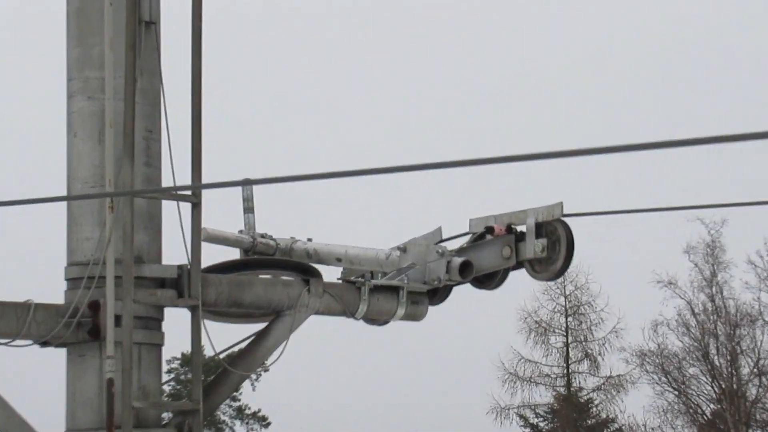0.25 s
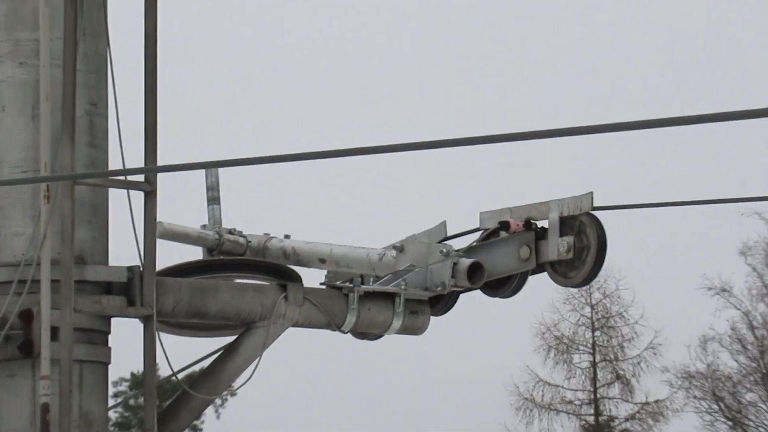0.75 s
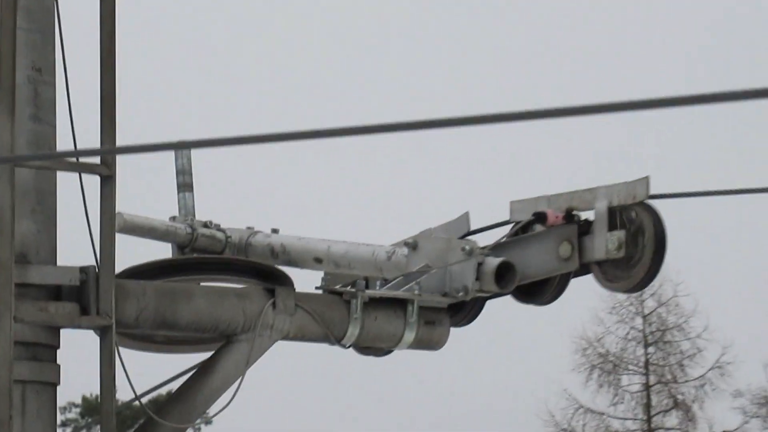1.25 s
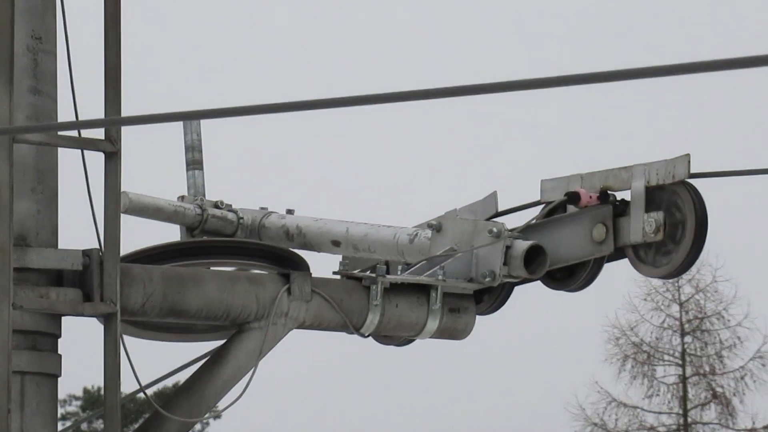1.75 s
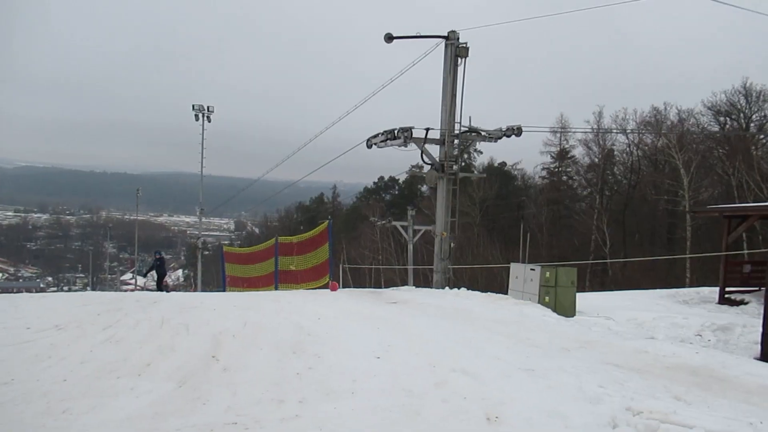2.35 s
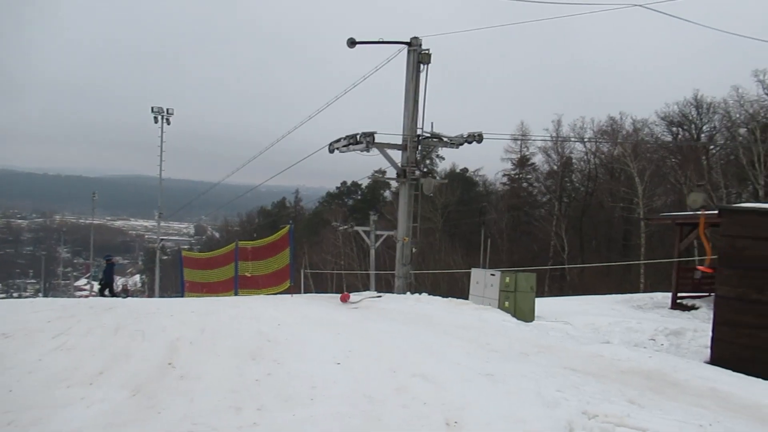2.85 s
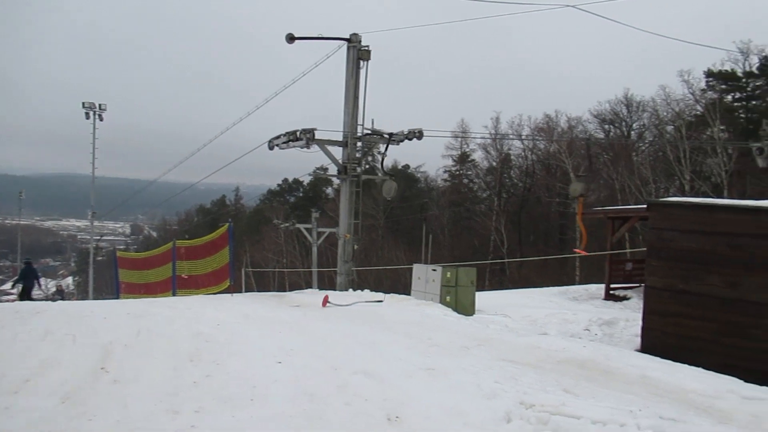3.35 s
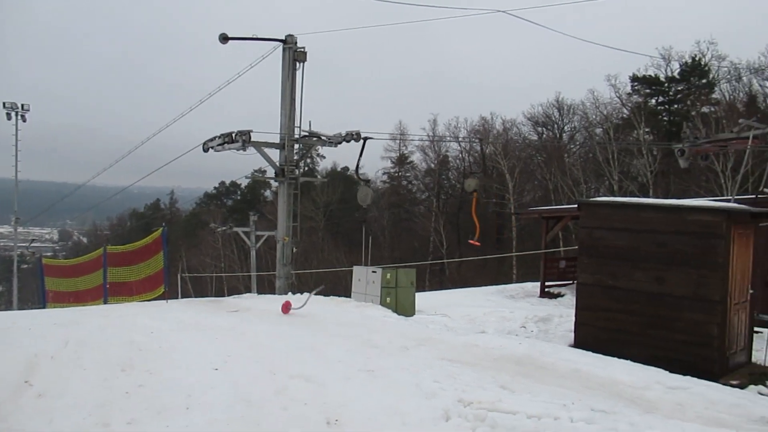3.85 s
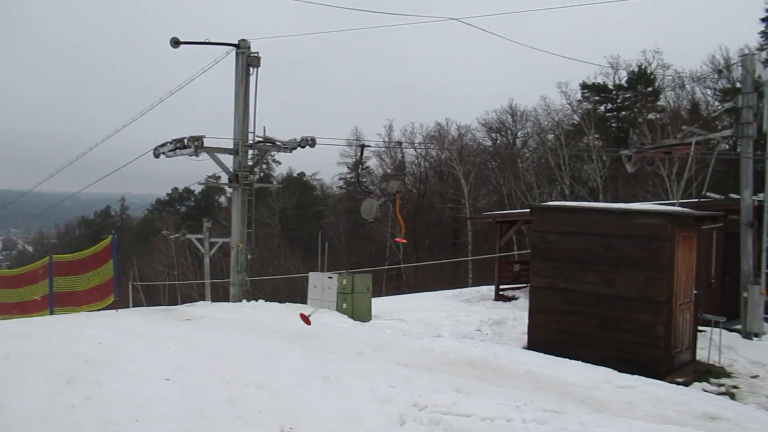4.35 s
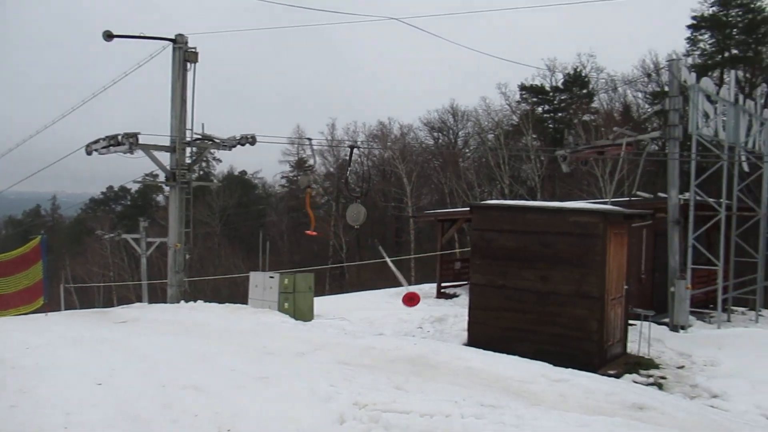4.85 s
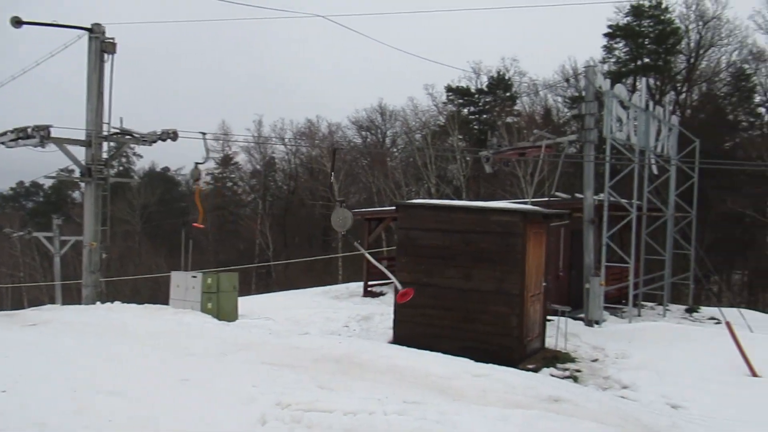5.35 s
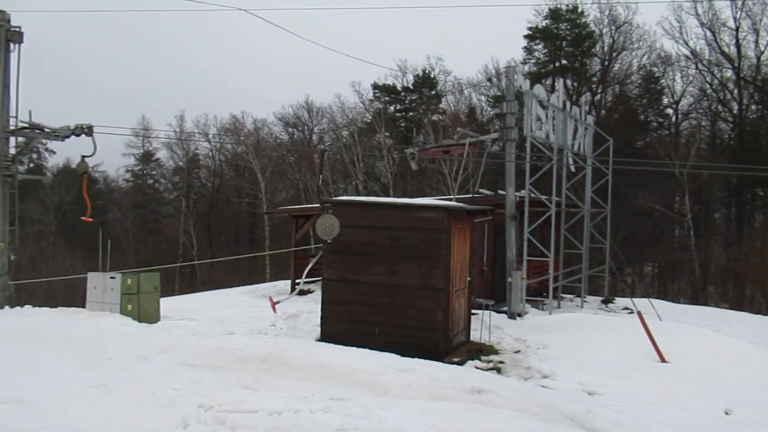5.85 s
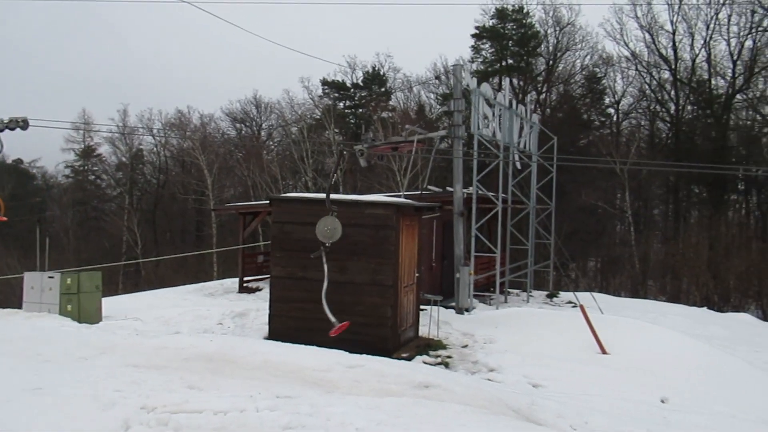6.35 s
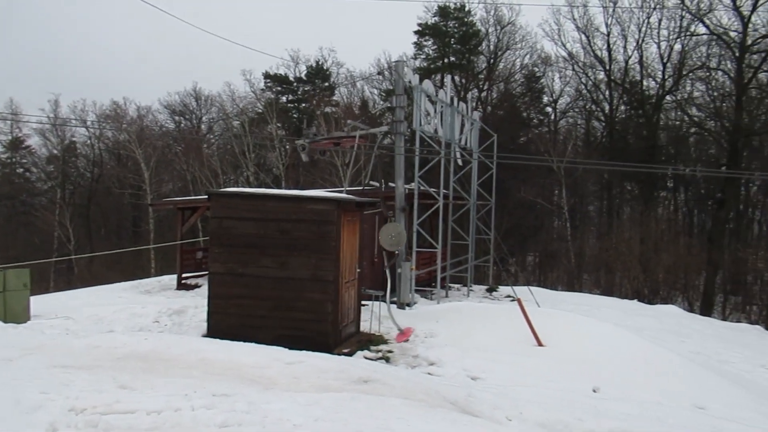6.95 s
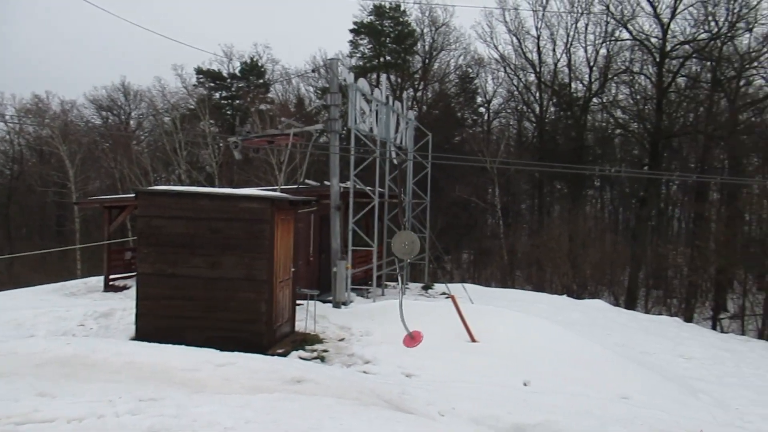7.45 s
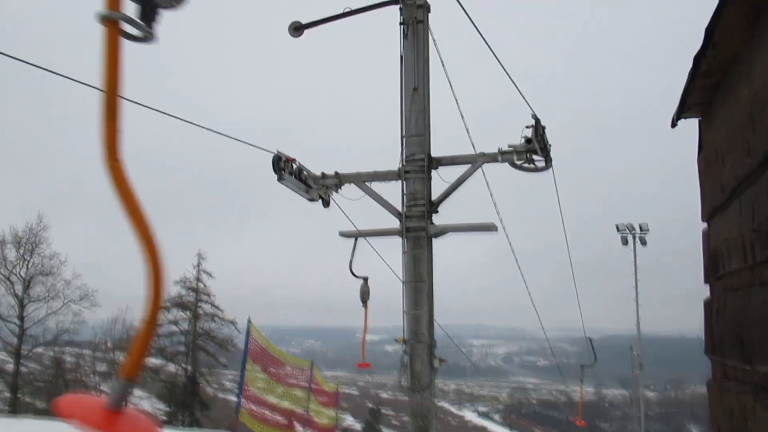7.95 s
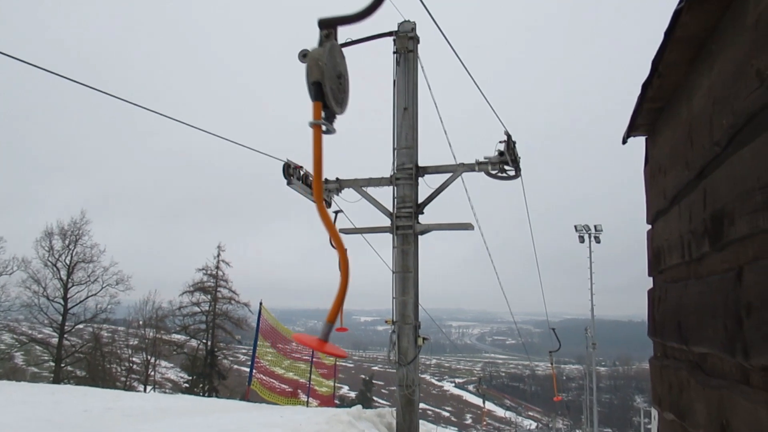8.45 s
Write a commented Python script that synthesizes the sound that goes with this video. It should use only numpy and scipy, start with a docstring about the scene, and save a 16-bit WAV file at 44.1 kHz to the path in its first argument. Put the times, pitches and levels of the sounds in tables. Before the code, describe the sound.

Outdoors in winter, a haul rope rolls over sheaves with a soft, cyclic rub, hiss and faint ring. After a brief silence, an empty metal platter scrapes and crunches over snow, its loose hanger rattling and knocking while wind thumps the microphone. It lifts off into rustles and separate clacks. Another short gap leads to a fierce, bright wind buffet over a faint, distant lift.

```python
"""A platter ski lift on a windy winter day, heard from three places with short silences between.
At the tower, the haul rope rolls over the sheaves as coloured noise that changes with each turn. On the track, an
empty platter scrapes over snow, then rubs and rustles after it lifts off, built of random grains and ringing
chips, while knocks ring the hanger's modes. Last, a platter passes overhead in a strong gust, with the lift far
off. At every place shaped noise and short bursts make the wind that buffets the microphone."""
import sys
import numpy as np
from scipy import signal
from scipy.fft import rfft, irfft, next_fast_len
from scipy.io import wavfile
from scipy.ndimage import uniform_filter1d, minimum_filter1d, map_coordinates

SR = 44100
rng = np.random.default_rng(int(sys.argv[2]) if len(sys.argv) > 2 else 0)


def waveform_to_disk(signal):
    """Save audio, clipped to [-1, 1], as 16-bit WAV at the path in sys.argv[1]."""
    frames = np.transpose(np.atleast_2d(signal))
    scaled = np.clip(frames, -1, 1) * 32767
    samples = np.round(scaled).astype(np.int16)
    wavfile.write(sys.argv[1], SR, samples)


N = 384547

# when the microphone hears each place: start t/s, end t/s
TOWER, TRACK, OVERHEAD = (0, 2.155), (2.365, 7.785), (8.003, 8.73)

# Table levels are in dB; some layers add a gain of their own.
# wind under the gusts: [t/s, level/dB], and its spectrum: [f/Hz, density/dB]
WIND_LEVEL = [(0, -52.5), (2.15, -45.5), (2.45, -28.5), (2.65, -43.5), (3.25, -31.5), (3.5, -36),
              (4.25, -25), (4.8, -33), (5.2, -38.5), (5.75, -29), (6.6, -38), (7.4, -37.5), (8, -40.5)]
WIND_SPECTRUM = [(25, -8.5), (60, 1.5), (110, -1), (200, -7.5), (310, -11), (520, -22.5), (850, -52.5)]
# gusts on the microphone: [start t/s, length/s, level/dB]
GUST_EVENTS = [(.4, 0.344, -41.5), (1.07, 0.28, -42.5), (2.39, 0.14, -28), (2.82, 0.07, -19.5),
               (3.045, 0.083, -20.5), (3.59, 0.13, -21.5), (3.865, 0.042, -16), (3.98, 0.51, -21.5),
               (4.58, 0.15, -20), (8, 0.07, -26.5), (8.093, 0.04, -27.5), (8.152, 0.066, -19.5),
               (8.215, 0.037, -19.5), (8.278, 0.12, -24.5)]
GUST_ATTACK_S, GUST_RELEASE_S = 0.0035, 0.0086
# single eddies that stand out at the microphone: [t/s, level/dB, centre f/Hz]
EDDY_EVENTS = [(0.43, -24, 145), (0.468, -26, 130), (0.575, -23, 124), (0.723, -26, 95.5), (1.24, -27, 119),
               (1.317, -22.5, 149), (1.666, -15, 156), (2.408, -19, 126), (2.476, -17.5, 130),
               (2.828, -12.5, 191), (2.875, -19.5, 222), (3.11, -17, 150), (3.654, -17, 230),
               (3.892, -17, 188), (3.981, -9.5, 110.7), (4.138, -14, 208), (4.174, -10.5, 200),
               (4.227, -19.5, 280), (4.345, -16.5, 220), (4.609, -4, 178), (4.647, -18.5, 246),
               (4.901, -13.5, 248), (4.98, -15.5, 184), (5.025, -23.5, 800), (5.035, -17.5, 162),
               (5.561, -15.5, 130), (5.623, -10.5, 202), (5.96, -23.5, 254), (6.294, -18.5, 116),
               (8.017, -11.5, 423), (8.064, -7, 570), (8.121, -22.5, 696), (8.166, -17.5, 560),
               (8.19, -14, 584), (8.208, -11.5, 550), (8.221, -12, 650), (8.229, -7, 726),
               (8.238, -10.5, 620), (8.359, -15.5, 587), (8.446, -29.5, 246), (8.483, -32, 250),
               (8.528, -25, 201)]
EDDY_CYCLES = 1.59  # nominal length, in cycles of the centre frequency
# sound of the lift far off, whose level dips during the strong gusts at the last place: [t/s, level/dB],
# and its spectrum: [f/Hz, density/dB]
FAR_LEVEL = [(8, -45.5), (8.15, -64), (8.4, -52), (8.55, -58), (8.72, -48)]
FAR_SPECTRUM = [(180, -40), (300, -23), (377, -8.5), (2400, -19.5), (3440, -26.5), (3860, -25),
                (9490, -27.5), (15000, -39)]
# faint ticks as the platter passes: [t/s, level/dB]
PASSING_TICKS = [(8.063, -49), (8.337, -47), (8.415, -42)]
ZOOM_END_S = 1.47
# squeaks of dry bearings: [t/s, f/Hz, level/dB, length/s]
BEARING_SQUEAKS = [(3.728, 2610, -37.5, 0.024), (4.309, 3900, -45.5, 0.043), (5.094, 1780, -41, 0.043),
                   (8.504, 1660, -56, 0.096)]

TURN_S = .399  # one turn of a sheave
# spectra at the tower, rope rolling, rubbing and hissing: [f/Hz, density/dB]
ROLL_SPECTRUM = [(25, -6), (70, 3), (200, -0.5), (420, -4), (830, -1.5), (1200, -6), (2000, -16),
                 (3300, -23.5), (3900, -67.5)]
RUB_SPECTRUM = [(1200, -10), (1900, 4), (2900, -4), (3500, -11.5), (3900, -28)]
HISS_SPECTRUM = [(3900, -19.5), (4900, -15.5), (5500, -5.5), (7700, -4), (10000, -6), (15500, -15)]
# resonances of the sheave's rim, and of its groove: [f/Hz, width/Hz, level/dB]
SHEAVE_MODES = [(1510, 56, 8), (815, 22, 2.5), (5630, 280, -13)]
GROOVE_MODES = [(1950, 150, 3), (3100, 490, -15), (7050, 1980, -15.5)]
# worn spots that strike the rim in every turn: [share of the turn, ring level/dB]
WORN_RIM_SPOTS = [(0.469, -2.5), (0.615, -6.5)]
# the rope chafing in the groove: [t/s, level/dB, length/s]
ROPE_CHAFES = [(1.364, -38, 0.026), (1.401, -30, 0.0039), (1.437, -25, 0.0013)]

# platter scraping over the snow, then rubbing and rustling after it lifts off:
# [start t/s, length/s, low level/dB, crisp treble level/dB]
PLATTER_RUBS = [(2.337, 0.39, -40, -49.5), (2.787, 0.35, -35, -44.5), (3.164, 0.14, -38.5, -42),
                (3.37, 0.46, -42, -47), (3.866, 0.18, -36.5, -45.5), (4.366, 0.15, -42, -75),
                (5.027, 0.63, -45.5, -55), (5.719, 0.12, -40.5, -53.5), (6.027, 0.18, -42.5, -59),
                (6.229, 0.08, -37, -66)]
RUB_ATTACK_S, RUB_RELEASE_S = 0.005, 0.049
RUSTLE_DB, RUSTLE_CRISP_DB = -44.5, -53  # the running lift, heard between the rubs
# spectra of the coarse, low grain and of the crisp treble: [f/Hz, density/dB]
SNOW_SPECTRUM = [(320, -30.5), (550, -1.5), (850, -0.5), (1480, -6), (2460, -8), (3980, -16), (6000, -22),
                 (7800, -50.5), (13200, -120)]
CRISP_SPECTRUM = [(2500, -7.5), (5000, 2), (7000, 3), (10500, -1.5), (11800, -3.5), (15000, -9.5)]
# the hanger's high ring, kept up by the drag: [t/s, level/dB]
SING_LEVEL = [(2.7, -75), (3.2, -47), (3.58, -51), (3.8, -77)]

# knocks of the hanger and its reel: [t/s, peak level/dB, high ring level/dB, favoured f/Hz]
HANGER_KNOCKS = [(2.372, -22, -35, 900), (2.672, -23, -10, 2260), (2.768, -20.5, -12.5, 1950),
                 (2.807, -28, -5, 1510), (2.936, -28, -5, 1100), (2.965, -33, -6, 1500),
                 (3.003, -25.5, -20, 1600), (3.044, -24, -7, 1700), (3.072, -29, -6, 2690),
                 (3.092, -21.5, -13, 2300), (3.134, -26, -5, 1600), (3.21, -25, -4, 2300),
                 (3.271, -26, -20, 2300), (3.308, -22.5, -2.5, 2760), (3.435, -18.5, -8, 2410),
                 (3.938, -23.5, -10, 3220), (3.976, -25.5, -7, 1490), (4.001, -24, -16, 2454),
                 (4.242, -20, -41, 2720), (5.191, -21.5, -35, 2800), (5.303, -22.5, -17, 1900),
                 (5.415, -22.5, -24, 2750), (5.443, -32.5, -3, 1600), (5.476, -27, -12, 5600),
                 (5.585, -23, 2.5, 2300), (5.725, -21, -30.5, 3300), (5.738, -10.5, -12, 3300),
                 (5.747, -25.5, -8.5, 1650), (5.766, -21.5, -11.5, 1600), (5.774, -30, -10.5, 3300),
                 (5.806, -15.5, -28, 1860), (5.864, -19.5, -49, 850), (5.928, -28, -22, 2700),
                 (6.387, -14.5, -10, 2500), (6.422, -28, -9, 2600), (6.502, -22, -7, 800),
                 (6.577, -14, -8, 4400), (6.897, -30.5, -43.5, 1100), (6.967, -11.5, -5, 2240),
                 (7.023, -29, -28, 780), (7.112, -30.5, -13, 3600), (7.456, -25.5, -12, 2500)]
# resonances of the hanger, and of its high ring: [f/Hz, width/Hz, level/dB]
HANGER_MODES = [(770, 94, -1.5), (1150, 120, -3), (1650, 110, -2), (2260, 100, 2.5), (2793, 470, -9),
                (3306, 85, -1), (3660, 53, -6), (4650, 88, 1), (6200, 220, -11), (8070, 200, -5)]
HIGH_MODES = [(9840, 89, -3), (10420, 510, 5.5)]
# spectrum of the crack of a knock: [f/Hz, density/dB]
CRACK_SPECTRUM = [(200, -4), (700, -7), (3000, -1), (5000, -1), (8500, -1), (15000, -21.5)]
REBOUND_S = (.018, .06)  # the loose reel knocks back after this long, earliest and latest
TAIL_T60 = .2  # s
LIFT_OFF_S = 4.1

TOP_HZ = 15100


def amp(db):
    """Decibels to gain."""
    return 10 ** (np.asarray(db) / 20)


def unit(x):
    """Scale to rms 1."""
    return x / np.sqrt(np.mean(x ** 2) + 1e-20)


def clock():
    """The time of each sample in seconds."""
    return np.arange(N) / SR


def curves(rows):
    """One value per sample for each column after the time."""
    s, *cols = np.transpose(rows)
    return [np.interp(clock(), s, c) for c in cols]


def wobble(rate):
    """A smooth random curve, rate knots a second."""
    t = clock()
    coarse = t[::16]
    knots = rng.standard_normal(int(N * rate / SR) + 4)
    return np.interp(t, coarse, map_coordinates(knots, [coarse * rate]))


def filtered(x, response):
    """x times a response of frequency."""
    m = next_fast_len(len(x) + 8192)
    spectrum = rfft(x, m) * response(np.fft.rfftfreq(m, 1 / SR))
    return irfft(spectrum, m)[:len(x)]


def colour(points):
    """The response through (f/Hz, level/dB) points, falling away beyond both ends."""
    f, db = np.transpose(points)
    knots = np.log([f[0] / 2, *f, f[-1] * 2])
    levels = [db[0] - 20, *db, -120]
    return lambda hz: amp(np.interp(np.log(hz + 1), knots, levels))


def body(modes):
    """The causal response of (f/Hz, width/Hz, level/dB) resonances, with alternating signs."""
    def response(f):
        return sum((-1) ** k * amp(db) * 1j * f * w / (c * c - f * f + 1j * f * w)
                   for k, (c, w, db) in enumerate(modes))
    return response


def bell(centre_hz, width_hz):
    """A band that falls away smoothly on both sides of its centre."""
    return lambda hz: np.exp(-((hz - centre_hz) / width_hz) ** 2)


def noise(response):
    """Steady noise of rms 1."""
    return unit(filtered(rng.standard_normal(N), response))


def place(sound, s):
    """A short sound set at time s."""
    return np.pad(sound, (max(round(s * SR), 0), N))[:N]


def burst(s, length, response, squeeze=1):
    """A short swell of noise around time s, with the energy of rms 1 over its length."""
    t = np.arange(-8192, 8192) / SR
    swell = np.exp(-2 * (t / (length * squeeze)) ** 2)
    puff = filtered(rng.standard_normal(len(t)) * swell, response)
    return place(puff * np.sqrt(length * SR / np.sum(puff ** 2)), s + t[0])


def during(span):
    """Open while a place is heard, with short fades."""
    return uniform_filter1d(1.0 * (clock() >= span[0]) * (clock() < span[1]), 128)


def swells(rows, attack_s, release_s):
    """The gain of (start, length, level/dB) events that each rise, hold and fall."""
    t = clock()
    gain = 0
    for s, length, db in rows:
        corners = [s, s + attack_s, s + length, s + length + release_s]
        gain = gain + amp(db) * np.interp(t, corners, [0, 1, 1, 0])
    return gain


def patchy(x, depth_db):
    """Colour that shifts from moment to moment, as contacts move from place to place."""
    z = signal.stft(x, nperseg=1024)[2]
    across_pitch = uniform_filter1d(rng.standard_normal(z.shape), size=5, axis=0)
    field = uniform_filter1d(across_pitch, size=4, axis=1)
    return unit(signal.istft(z * amp(depth_db * unit(field)), nperseg=1024)[1][:N])


def eddy(centre_hz, rise, fall):
    """Pressure of turbulence on the microphone's port: a hump with a steep fall above it."""
    return lambda hz: (hz / centre_hz) ** rise * np.exp(-fall * hz / centre_hz)


def turbulence(level_db, response, lump_db):
    """Wind noise at a given level, broken into lumps."""
    lumps = amp(lump_db * np.tanh(wobble(55)))
    return amp(level_db) * unit(lumps * noise(response))


def gusting(centre_hz, lump_db, rate, knock_db, knock_hz):
    """The inside of a gust: lumpy turbulence with a spatter of small, sharp eddies, rate a second."""
    knocks = (rng.random(N) < rate / SR) * rng.uniform(-1.4, 1, N)
    sharp = unit(filtered(knocks, eddy(knock_hz, rise=0.74, fall=1.48)))
    return unit(turbulence(0, eddy(centre_hz, rise=1.88, fall=2.3), lump_db) + amp(knock_db) * sharp)


def buffets():
    """Single eddies thump the microphone; faster ones are shorter and brighter."""
    return sum(amp(db) * burst(s, EDDY_CYCLES / hz, eddy(hz, rise=1.656, fall=2.26), squeeze=0.88)
               for s, db, hz in EDDY_EVENTS)


def far_lift():
    """The lift at a distance as soft coloured noise, with faint ticks as the platter passes."""
    air = amp(curves(FAR_LEVEL)[0]) * noise(colour(FAR_SPECTRUM))
    return air + sum(amp(db) * burst(s, 0.0022, colour(CRISP_SPECTRUM)) for s, db in PASSING_TICKS)


def zoom(whine_hz=4370, width_hz=170, whine_db=-69, run_down_s=0.15):
    """The lens motor whines faintly, as narrow noise, while the camera zooms in, then runs down."""
    running = np.clip((ZOOM_END_S - clock()) / run_down_s, 0, 1)
    return amp(whine_db) * running * noise(bell(whine_hz, width_hz))


def squeaks(width_hz=130):
    """Dry bearings give brief, rough whistles: narrow bands of noise."""
    return sum(amp(db) * burst(s, length, bell(hz, width_hz)) for s, hz, db, length in BEARING_SQUEAKS)


def each_turn(share, width):
    """A hump from 0 to 1 that comes round once in every turn; both settings are shares of a turn."""
    distance = (clock() / TURN_S - share + .5) % 1 - .5
    return np.exp(-(distance / width) ** 2)


def swish(mid_hz=2500, glide_hz=3300, band_hz=420, turn_share=0.12):
    """Once a turn a swish slides downwards: narrow noise on a falling carrier."""
    angle = (clock() / TURN_S + .5) % 1 - .5
    carrier = np.sin(2 * np.pi * np.cumsum(mid_hz - glide_hz * angle) / SR)
    return unit(np.exp(-(angle / turn_share) ** 2) * carrier * noise(bell(0, band_hz)))


def sheaves(roll_db=-42, rub_db=-50, slide_db=-58, hiss_db=-52, ring_db=-42, ring_rest_db=-16,
            grit_db=2, press_db=2, hiss_press_db=3.0, slack_db=6.0):
    """The rope rolls; once a turn it presses into the groove and eases, and worn spots ring the rim."""
    slack = slack_db * each_turn(share=0.786, width=0.053)
    rub = press_db * each_turn(share=0.48, width=0.054) - slack
    hiss = hiss_press_db * sum(each_turn(share, width=0.088) for share, _ in WORN_RIM_SPOTS) - slack
    ring = amp(ring_rest_db) + sum(amp(db) * each_turn(share, width=0.072) for share, db in WORN_RIM_SPOTS)
    grit = grit_db * wobble(120)
    out = amp(roll_db + 1.58 * wobble(8.89)) * noise(colour(ROLL_SPECTRUM))
    out += amp(rub_db + rub + grit) * noise(colour(RUB_SPECTRUM))
    out += amp(hiss_db + hiss + grit) * noise(colour(HISS_SPECTRUM))
    out += amp(ring_db + 2 * grit) * ring * noise(body(SHEAVE_MODES))
    out += amp(slide_db) * swish()
    return out + sum(amp(db) * burst(s, length, body(GROOVE_MODES)) for s, db, length in ROPE_CHAFES)


def rub_levels():
    """The levels in dB of the low grain and of the crisp treble: scrapes and rubs over a steady rustle."""
    start, length, low, crisp = np.transpose(PLATTER_RUBS)

    def level(db, rustle_db):
        gain = swells(zip(start, length, db), RUB_ATTACK_S, RUB_RELEASE_S)
        return 20 * np.log10(np.hypot(gain, amp(rustle_db)))
    return level(low, RUSTLE_DB), level(crisp, RUSTLE_CRISP_DB)


def crunch(rate, spread_db):
    """Grains, such as breaking snow crystals: random impulses of uneven size, rate a second."""
    return (rng.random(N) < rate / SR) * rng.standard_normal(N) * amp(spread_db * rng.standard_normal(N))


def chips(rate=260, centre_hz=1400, octaves=0.602, cycles=5, spread_db=4.0):
    """Small pieces, such as breaking icy lumps, each with a short ring of its own pitch."""
    count = int(rate * N / SR)
    start, pitch, size = rng.random((count, 3)).T[:, :, None]
    hz = centre_hz * 2 ** (octaves * np.sqrt(2) * np.tan(2 * pitch - 1) + pitch / 2)
    age = np.arange(SR // 50)  # samples since the break
    turns = hz * age / SR
    loudness = amp(-spread_db * np.log(size + .02))
    rings = loudness * np.sin(2 * np.pi * turns) * np.exp(-turns / cycles)
    when = (start * N).astype(int) + age
    return unit(np.bincount(when.ravel(), rings.ravel(), N)[:N])


def judder(rate=55, uneven_db=5, tick_s=0.0035):
    """Coarse lumps pass at an uneven rate, each a tick that starts at once and dies within milliseconds."""
    passed = np.floor(np.cumsum(rate * amp(uneven_db * wobble(rate))) / SR)
    lumps = np.diff(passed, prepend=0) * rng.random(N)
    return unit(signal.lfilter([1], [1, -np.exp(-1 / (tick_s * SR))], lumps))


def platter(low_db=-2.0, crisp_db=-2.5, clump_db=3.0, patchy_db=3.5, grain_db=-3, chip_db=-4):
    """The platter scrapes, then rubs and rustles, in clumps of grains and chips; harder is more uneven."""
    low_level, crisp_level = rub_levels()
    pressure = np.interp(low_level, [-45, -35], [.5, 1])
    clumps = clump_db * pressure * (np.tanh(wobble(60)) + 0.53 * np.tanh(wobble(240)))
    low = patchy(filtered(crunch(rate=5000, spread_db=-0.5), colour(SNOW_SPECTRUM)), patchy_db)
    high = patchy(filtered(crunch(rate=12000, spread_db=1.5), colour(CRISP_SPECTRUM)), patchy_db / 2)
    ticks = amp(grain_db) * pressure * judder()
    sing = amp(curves(SING_LEVEL)[0] + clumps) * noise(body(HIGH_MODES))
    coarse = amp(low_db) * (amp(clumps) + ticks) * low + amp(chip_db + clumps) * chips()
    treble = (amp(1.6 * clumps) + ticks / 2) * high
    return amp(low_level) * coarse + amp(crisp_level + crisp_db) * treble + sing


def loudest(x):
    """Scale so that the loudest 4 ms have rms 1."""
    return x / np.sqrt(uniform_filter1d(x * x, size=176).max())


def knock_force(t, t60, rise_s=0.00043, strike_db=11, tail_db=-26, rebound_db=-20):
    """A strike and a few milliseconds of chatter, with a weak rebound and a faint outdoor tail."""
    def contact(start):
        rise = 1 - np.exp(-np.maximum(t - start, 0) / rise_s)
        return rise * amp(-60 * np.abs(t - start) / t60)
    rebound = amp(rebound_db) * contact(rng.uniform(*REBOUND_S))
    fade = contact(0) + rebound + amp(tail_db - 60 * t / TAIL_T60)
    return fade * rng.standard_normal(len(t)) + amp(strike_db) * (t == 0)


def struck_modes(favoured_hz, detune, favour_db=6, favour_octaves=0.23):
    """The hanger's modes for one knock: every point of contact favours other ones."""
    modes = []
    for hz, width, level in HANGER_MODES:
        favour = favour_db * np.exp(-(np.log2(hz / favoured_hz) / favour_octaves) ** 2)
        modes.append((hz * rng.normal(1, detune), width, level + favour + rng.normal(0, 1.7)))
    return modes


def hanger(clack_db=-5.0, crack_db=-3, chatter_t60=0.027, drag_t60=0.034, bright_hz=29000, hardness=0.37):
    """Each knock drives the hanger's steel modes, a broad crack and a high ring."""
    t = np.arange(SR // 5) / SR
    out = np.zeros(N)
    for s, db, high_db, favoured_hz in HANGER_KNOCKS:
        # while the platter is on the snow the chatter lasts longer and the changing load detunes the modes
        t60, detune = (drag_t60, .05) if s < LIFT_OFF_S else (chatter_t60, .015)
        force = knock_force(t, t60)
        # weak knocks, and soft ones that hardly wake the high ring, are duller
        soft_hz = bright_hz * amp(hardness * (db + high_db))
        chatter = filtered(force, lambda hz: 1 / (1 + 1j * hz / soft_hz) ** 2)
        steel = loudest(filtered(chatter, body(struck_modes(favoured_hz, detune))))
        crack = loudest(filtered(chatter, colour(CRACK_SPECTRUM)))
        high = loudest(filtered(chatter, body(HIGH_MODES)))
        out += place(amp(db + clack_db) * (steel + amp(crack_db) * crack + amp(high_db) * high), s)
    return out


def scene():
    """Three places in turn, in one wind: gusts are dull at first, bright under the passing platter."""
    gusts = swells(GUST_EVENTS, GUST_ATTACK_S, GUST_RELEASE_S)
    dull = gusts * gusting(centre_hz=127.3, lump_db=6.5, rate=32, knock_db=-2.5, knock_hz=166)
    bright = gusts * gusting(centre_hz=368, lump_db=0, rate=380, knock_db=-2.5, knock_hz=486)
    wind = turbulence(curves(WIND_LEVEL)[0], colour(WIND_SPECTRUM), lump_db=7.0) + buffets()
    bearings = squeaks()
    tower = sheaves() + zoom() + dull + wind
    track = platter() + hanger() + bearings + dull + wind
    overhead = far_lift() + bearings + bright + wind
    return during(TOWER) * tower + during(TRACK) * track + during(OVERHEAD) * overhead


def record(dry):
    """The camera's limiter holds down the highest peaks, and its band limit cuts the top treble."""
    needed = np.minimum(1, .85 / (np.abs(dry) + 1e-9))
    gain = uniform_filter1d(minimum_filter1d(needed, size=177), size=177)
    return filtered(dry * gain, lambda hz: np.clip((TOP_HZ - hz) / 200 + .5, 0, 1))


dry = scene()
out = record(dry)
waveform_to_disk(out)
```